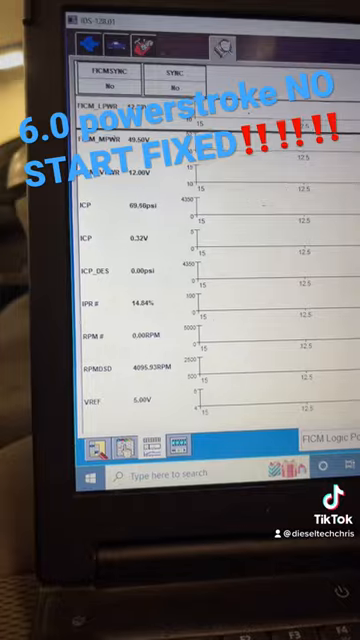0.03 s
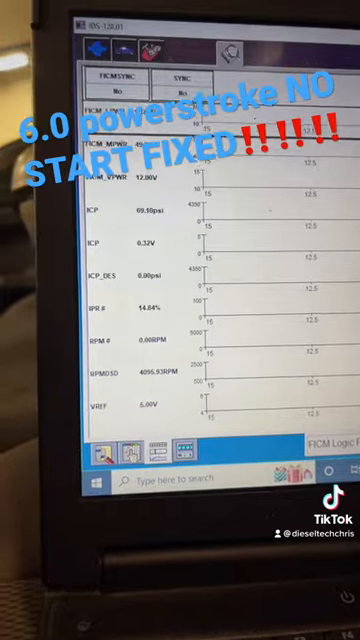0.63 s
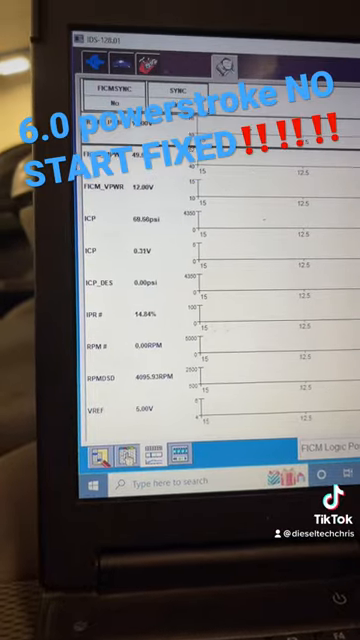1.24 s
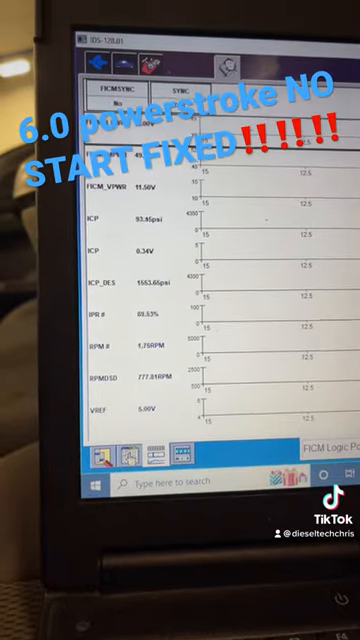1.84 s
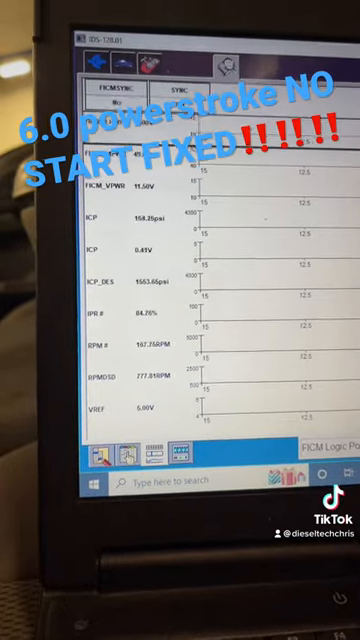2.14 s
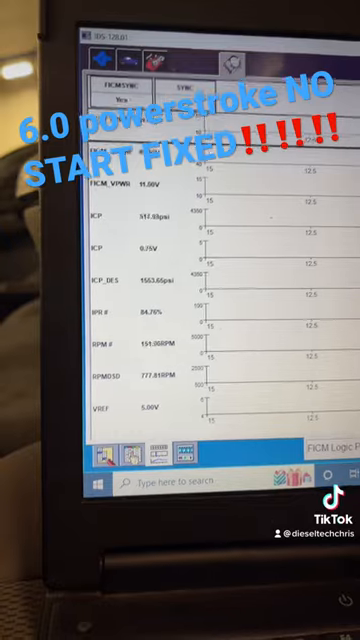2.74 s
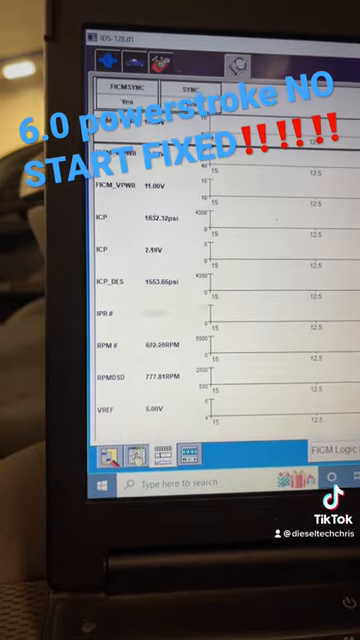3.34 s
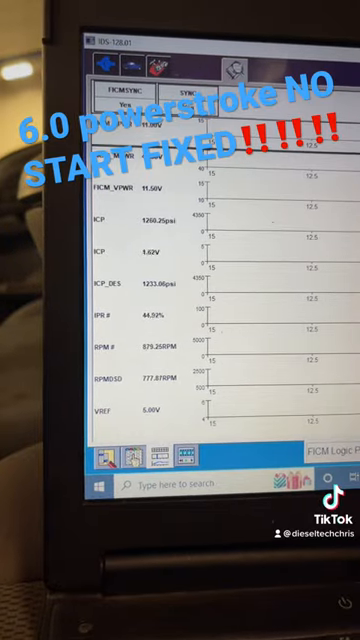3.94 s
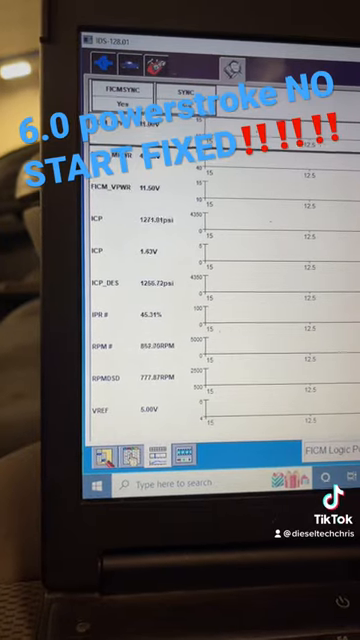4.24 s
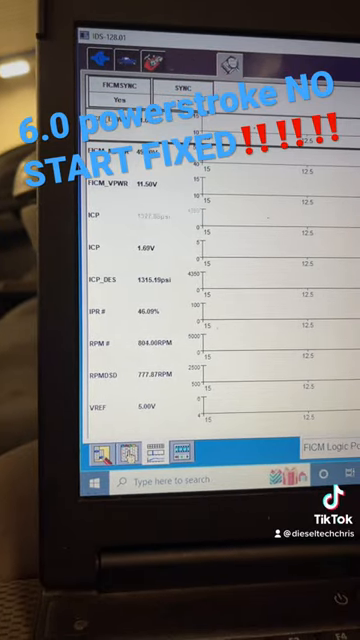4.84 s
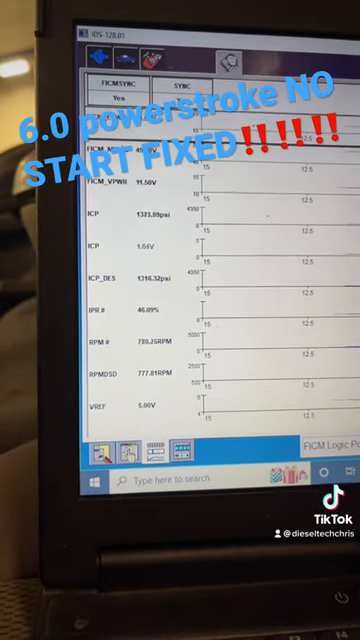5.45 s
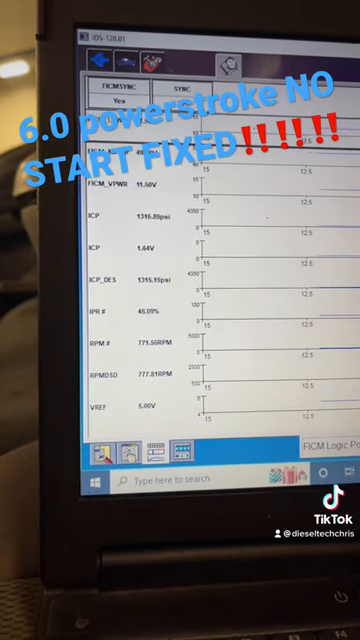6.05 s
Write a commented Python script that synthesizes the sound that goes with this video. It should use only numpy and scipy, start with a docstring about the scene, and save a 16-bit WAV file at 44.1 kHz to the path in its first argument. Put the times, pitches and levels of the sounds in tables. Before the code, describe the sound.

Inside a truck cab, a fuel pump hums faintly. The ignition key clicks and the starter grinds in a pulsing rhythm for just over a second. The diesel engine catches with low thuds and a loud burst of metallic knocking, and the key snaps back. The revs then sink into a steady idle, with a deep boom and ticking clatter heard from the driver's seat.

```python
"""A fuel pump hums faintly in the cab of a V8 diesel truck. The key clicks round and the starter
grinds over a dozen compressions, each of which modulates the pitch and level of its gears. The
engine catches: heavy firings rock the frame, combustion impacts ring the metal in a burst of hard
knock, and the key springs back. As the revs sink to idle, the second harmonic of the firing rate
slides into a cab resonance and booms."""
import sys
import numpy as np
from scipy import signal
from scipy.fft import rfft, irfft, next_fast_len
from scipy.io import wavfile

SR = 44100
rng = np.random.default_rng(int(sys.argv[2]) if len(sys.argv) > 2 else 0)


def log_audio(samples):
    """Write samples as a 16-bit WAV file to the path given in sys.argv[1]."""
    # one column per channel
    frames = np.atleast_2d(samples).T
    # limit to full scale, then quantise
    limited = np.clip(frames, -1, 1)
    pcm = np.round(limited * 32767).astype(np.int16)
    wavfile.write(sys.argv[1], SR, pcm)


N = 268877
T = np.arange(N) / SR
PADDED = next_fast_len(N + 4096)
HZ = np.fft.rfftfreq(PADDED, 1 / SR)


def amp(db):
    """Amplitude ratio of a level in decibels."""
    return 10 ** (np.asarray(db) / 20)


def unit(x):
    """Normalisation to rms 1."""
    return x / np.sqrt(np.mean(x ** 2) + 1e-20)


def noise():
    """Gaussian white noise."""
    return rng.standard_normal(N)


def wander(hz, t=T):
    """Random fluctuation up to about hz, rms near 1."""
    knots = rng.standard_normal(2048)
    return np.interp(t * hz * 2, np.arange(len(knots)), knots)


def ramp(start, end):
    """Linear rise from 0 to 1 between two times."""
    return np.clip((T - start) / max(end - start, 1e-3), 0, 1)


def swell(start, attack, hold, t60, db):
    """Envelope of linear attack, hold and exponential decay; times in seconds."""
    return ramp(start, start + attack) * amp(db - 60 * np.maximum(T - start - attack - hold, 0) / t60)


def gain_at(spectrum, hz):
    """Spectral envelope at hz, interpolated in level over log frequency."""
    f, db = np.transpose(spectrum)
    return amp(np.interp(np.log(hz + 1), np.log(f + 1), db))


def colour(x, spectrum, modes=(), ripple_db=0):
    """Source-filter shaping by an envelope, strong modes and the ripple of many weak ones; rms 1."""
    peaks = sum(amp(db) / (1 + (2 * (HZ - f) / width) ** 2) for f, width, db in modes)
    ripple = np.interp(HZ / 22, np.arange(1024), rng.uniform(-1, 1, 1024))
    gain = gain_at(spectrum, HZ) * (1 + peaks) * amp(ripple_db * ripple * np.minimum(HZ / 2000, 1))
    return unit(irfft(rfft(x, PADDED) * gain, PADDED)[:N])


def resonate(x, hz, width):
    """Forced resonance: a double pole of peak gain 1 takes time to build up and die."""
    r = np.exp(-np.pi * width / SR)
    carrier = np.exp(2j * np.pi * hz * T)
    return 2 * (carrier * signal.lfilter([(1 - r) ** 2], [1, -2 * r, r ** 2], x / carrier + 1e-18)).real


def impacts(cycles, scatter_db, t60):
    """Impact excitation: one uneven blow a cycle rings the dense modes of a metal part."""
    whole = np.maximum.accumulate(np.floor(cycles))
    blows = (np.diff(whole, prepend=whole[0]) > 0) * amp(scatter_db * noise())
    tail = rng.standard_normal(4096) * amp(-60 * T[:4096] / t60)
    return signal.oaconvolve(blows, tail / np.linalg.norm(tail))[:N]


# Partials of the pump's hum and spectrum of its hiss: f/Hz, level/dB
PUMP_PARTIALS = [(118.4, -65), (232, -76), (263.8, -79), (308, -82), (1351, -83), (2073, -79)]
HISS_SPECTRUM = [(22, -31), (50, -13), (88, 0), (125, -42), (180, -12), (260, -14), (420, -18), (700, -22),
                 (1300, -18.5), (1700, -18.5), (2080, -19), (2900, -26.5), (6900, -34.5), (15000, -45)]

def fuel_pump():
    """A line spectrum over broadband noise: the pump runs once the ignition is on."""
    wavering_time = T + np.cumsum(.0035 * wander(12)) / SR
    hum = sum(amp(db) * np.sqrt(2) * np.sin(2 * np.pi * hz * wavering_time) for hz, db in PUMP_PARTIALS)
    whine = amp(-70) * np.sin(2 * np.pi * 786 * wavering_time) * ramp(.4, .41)
    hiss = amp(-60.5) * colour(noise(), HISS_SPECTRUM, ripple_db=4.5)
    return (hum + whine + hiss) * ramp(.256, .262)


# Lock and solenoid clicks: t/s, level/dB, t60/s, power share of the thunk
KEY_CLICKS = [(0.859, -41, 0.085, .5), (0.892, -49, 0.05, 0.75), (0.92, -41, .07, 0.88),
              (0.931, -39, 0.095, .05), (2.452, -30, .03, 0), (2.702, -25.5, .05, 0.1),
              (2.777, -37, .04, .02)]
# Spectra of the bright snap and the dull thunk: f/Hz, level/dB
SNAP_SPECTRUM = [(500, -30), (3000, 7), (5500, 1), (7000, 6), (9000, -7), (11000, 0), (13000, -11),
                 (15500, -28)]
THUNK_SPECTRUM = [(80, -10), (300, -6), (600, 9), (900, -9), (2400, -5), (5000, -13), (12000, -35)]

def key_and_solenoid():
    """Damped transients: the ignition lock snaps round and back, and the solenoid thunks in."""
    snap = colour(noise(), SNAP_SPECTRUM)
    thunk = colour(noise(), THUNK_SPECTRUM)
    clicks = 0
    for start, db, t60, dull in KEY_CLICKS:
        decay = ramp(start, start + .00067) * amp(db - 60 * np.maximum(T - start, 0) / t60)
        clicks += decay * (np.sqrt(1 - dull) * snap + np.sqrt(dull) * thunk)
    return clicks


# First heavy firings that rock the engine on its mounts: t/s, level/dB
MOUNT_THUDS = [(2.305, -25), (2.359, -24), (2.405, -19), (2.437, -21), (2.486, -26)]

def mounts():
    """Structure-borne sound: firings kick two low frame modes, and the cab shakes as the revs flare."""
    thuds = 0
    for start, db in MOUNT_THUDS:
        age = np.maximum(T - start, 0)
        modes = np.sin(2 * np.pi * 47 * age) - np.sin(2 * np.pi * 86 * age)
        thuds += amp(db - 60 * age / .23) * modes * ramp(start, start + .0055)
    shake = colour(noise(), [(25, -39), (50, -13), (85, 6), (105, 3.5), (145, -9), (200, -33),
                             (900, -71)])
    return thuds + swell(2.24, attack=.28, hold=.2, t60=2.5, db=-24.8) * shake


ENGAGE_S, CATCH_S, TOP_S = .915, 2.19, 2.68
CRANK_HZ, TOP_HZ, IDLE_HZ = 10.1, 64.6, 50.1

def stroke_rates():
    """Fundamentals in compressions a second: cranking alone, and as the engine flares and settles."""
    shortfall, spin_up_s, settle_s = .4, .22, 1.2
    lag = shortfall * np.exp(-np.maximum(T - ENGAGE_S, 0) / spin_up_s)
    crank_hz = CRANK_HZ * (1 - lag) * (T > ENGAGE_S)
    governed_hz = IDLE_HZ + (TOP_HZ - IDLE_HZ) / (1 + (np.maximum(T - TOP_S, 0) / settle_s) ** 2.3)
    caught = np.sin(np.pi / 2 * ramp(CATCH_S, TOP_S)) ** 2
    return crank_hz, crank_hz + caught * (governed_hz - crank_hz)


# Spectra of the gears spinning up and at speed, and of the rocking block: f/Hz, level/dB
SLOW_GEAR_SPECTRUM = [(150, -14), (260, -4), (380, -13), (640, -10), (860, -1), (1130, -3), (1340, -13),
                      (1660, -8.5), (2250, -8), (2920, -15.5), (3500, -21), (5000, -29), (6600, -29.5),
                      (9000, -45), (15500, -56)]
FAST_GEAR_SPECTRUM = [(150, -19.5), (380, -6), (520, -17), (720, -6), (1350, -4), (1800, -13.5),
                      (2200, -7.5), (2850, -11), (3350, -17), (3800, -17.5), (4800, -27.5), (6600, -26),
                      (9000, -43), (15500, -53)]
SHUDDER_SPECTRUM = [(13, -42), (22, 0), (38, 1.5), (54, 4), (104, -3), (125, -12), (146, -10), (200, -27),
                    (260, -48), (440, -120)]
# Resonances of the starter housing: f/Hz, bandwidth/Hz, level/dB
HOUSING_MODES = [(890, 39.6, -6), (1183, 48, -0.5), (1383, 75, -2.5), (2070, 41.4, -4), (3800, 110, 0),
                 (6650, 540, -12)]

def starter(crank_hz, strokes):
    """Gear-mesh harmonics under load modulation: each compression slows the motor, then lets it race."""
    teeth_per_stroke = 33.9
    elapsed = T - ENGAGE_S
    racing = -np.cos(2 * np.pi * strokes) * ramp(1.05, 1.42)  # high between compressions
    unloaded = ramp(2.25, 2.42)  # the firing engine takes over
    sway = 1 + .028 * np.cos(2 * np.pi * (strokes - .35)) + .011 * wander(50)
    teeth = np.cumsum(teeth_per_stroke * crank_hz * (1 + .16 * unloaded) * sway) / SR
    whine = 0
    for k in range(1, 13):
        whine += np.cos(2 * np.pi * (k * teeth + rng.random())) * (1 + 1.3 * wander(60)) * min(k / 3, 1)
    grind = noise() * np.exp(.2 * np.cos(2 * np.pi * .57 * teeth))  # the armature scrapes once a turn
    drive = unit(grind) + amp(-12.5) * unit(whine)
    at_speed = ramp(1.205, 1.373)
    slow = np.sqrt(1 - at_speed) * colour(drive, SLOW_GEAR_SPECTRUM, ripple_db=6)
    fast = np.sqrt(at_speed) * colour(drive, FAST_GEAR_SPECTRUM, HOUSING_MODES, ripple_db=3.5)
    gears = (amp(-2) * slow + fast) * ramp(.9, .955) * amp(-32.6 + 2.6 * elapsed + 1.5 * racing)
    squawk = colour(drive, [(600, -40), (860, 0), (1120, -1), (1400, -25), (4000, -50)])
    squawk *= swell(1.1, attack=.025, hold=.01, t60=.28, db=-34.5)  # the pinion takes the load
    brushes = colour(noise(), [(3000, -30), (6500, 11), (9000, -5), (15000, -3)])
    brushes *= amp(-63.2 + 2.2 * elapsed + 3.2 * racing)
    lurch = swell(.935, attack=.035, hold=.015, t60=1.1, db=-37.5)  # the starter's bite twists the block
    rocking = (lurch + amp(-39.8) * ramp(1.24, 1.31)) * amp(1.4 * np.cos(2 * np.pi * (strokes - .6)))
    shudder = rocking * colour(noise(), SHUDDER_SPECTRUM)
    return (gears + squawk + brushes + shudder) * ramp(.904, .925) * (1 - unloaded)


CYLINDERS = 8
# Transmission of the exhaust into the cab: f/Hz, level/dB
CAB_RESPONSE = [(20, -24), (36, -15), (48, -15), (62, 0), (76, -1), (92, 5), (109, 13), (122, -8.5),
                (140, 7.5), (156, -11.5), (172, -1), (186, -4.5), (202, -1), (214, -6.5), (232, 0.5),
                (245, 1.5), (262, -5), (290, -12.5), (450, -14.5), (800, -36.5)]

def exhaust_rumble(firing_hz, strokes):
    """Unequal cylinders repeat once an engine cycle, giving a comb at eighths of the firing rate."""
    t, hz, cycles = T[::16], firing_hz[::16], strokes[::16]
    comb = 0
    for order in np.arange(3, 64) / CYLINDERS:
        phase = 2 * np.pi * (order * cycles + rng.random()) + .41 * wander(4, t)
        comb += gain_at(CAB_RESPONSE, order * hz) * np.cos(phase)
    comb = np.interp(T, t, comb * np.sqrt(hz))  # offsets the crowding of orders at low speed
    puffs = colour(noise() * np.exp(-(strokes % 1) / .5), CAB_RESPONSE + [(3000, -90)])
    return amp(-27.2) * (unit(comb) + amp(-9) * puffs) * ramp(2.25, 2.42)


# Cab resonances: driving harmonic of the firing rate, f/Hz, bandwidth/Hz, level/dB
CAB_MODES = [(1, 51.3, 4, -31), (2, 108, 7.5, -12.4)]

def exhaust_tones(strokes):
    """Swept resonance: harmonics of the firing rate boom as they slide into the cab's modes."""
    phase = 2 * np.pi * strokes
    sharpness = ramp(2.5, 2.65) * (1 - ramp(2.69, 2.8))  # full fuel sharpens the pulses
    pulses = np.sin(phase) + amp(-4.5) * np.sin(2 * phase) + amp(-7) * sharpness * np.sin(3 * phase)
    uneven = amp(1.5 * wander(12))  # cold cylinders burn unequally
    flare = swell(2.46, attack=.17, hold=.04, t60=2.9, db=-19.3) * uneven * pulses
    lope = 1 + .33 * np.cos(phase / CYLINDERS)  # one throb an engine cycle
    booms = sum(amp(db) * resonate(lope * np.sin(k * phase), f, width) for k, f, width, db in CAB_MODES)
    steady = (amp(-35.5) * np.sin(phase) + booms) * ramp(2.31, 2.43)
    return np.sqrt(2) * (flare + steady)


# Spectra of hard knock, idle clatter and injector fizz: f/Hz, level/dB
KNOCK_SPECTRUM = [(150, 8), (250, -11.5), (550, -3), (740, 0), (1030, -3), (1700, -4), (2600, -4),
                  (3120, -1), (3450, -12), (4000, -14.5), (5000, -22.5), (6600, -17), (9000, -27.5),
                  (12000, -44.5), (15500, -52)]
IDLE_SPECTRUM = [(150, -15), (290, 1), (450, -1), (600, -2), (850, 0.5), (1500, -1), (1750, -2.5),
                 (2700, -9), (3350, -8), (4600, -15.5), (5200, -18.5), (7000, -20), (9000, -35.5),
                 (12000, -39.5), (15500, -48)]
FIZZ_SPECTRUM = [(3000, -26), (6500, 6.5), (9000, -1.5), (11000, -2), (15500, -8)]
# Resonances of the engine metal under hard knock and at idle: f/Hz, bandwidth/Hz, level/dB
HARD_KNOCK_MODES = [(1038, 57, 1), (1520, 50, 1), (2850, 72, -2), (2930, 43, -4), (3165, 37, -3)]
IDLE_MODES = [(464, 35, -9.5), (815, 44, -6), (1030.3, 34, -6), (1456, 64, -5.5), (1609.6, 43, -11),
              (2040, 54, -10), (2280, 120, -10), (3470, 66, -7), (4175, 95, -5), (5150, 270, -2.5),
              (7230, 350, -5.5)]

def engine_clatter(strokes):
    """Impacts excite structural modes: cylinders knock, injectors and valves tick."""
    taps = 0
    for pair in range(4):
        revolutions = (strokes - pair) / 4
        knocks = impacts(revolutions + .004 * wander(30), scatter_db=1.2, t60=.11)
        ticks = impacts(strokes + pair / 4 + .13 * wander(30), scatter_db=2.1, t60=.019)
        taps += knocks + amp(-2) * ticks
    taps = colour(taps, [(300, .5), (550, -2), (1500, -1.3), (2500, -3.5), (6000, -7.5), (15000, -6.5)])
    wash = colour(noise(), [(300, -3), (550, -3), (1500, .8), (2500, 1), (6000, -1), (15000, -1.5)])
    drive = taps + amp(4.5) * wash  # the engine bay smears the blows, most in the treble
    weak = swell(2.205, attack=.035, hold=.1, t60=.5, db=-29.3)  # the first cylinders barely light
    hard = swell(2.3, attack=.17, hold=.045, t60=1.2, db=-17)  # all burn on full starting fuel
    knock = (weak + hard) * colour(drive, KNOCK_SPECTRUM, HARD_KNOCK_MODES, ripple_db=1.5)
    idle = amp(-27.3) * ramp(2.2, 3.3) * colour(drive, IDLE_SPECTRUM, IDLE_MODES, ripple_db=4.5)
    knock_edge = swell(2.31, attack=.12, hold=.13, t60=.45, db=-47.5) + amp(-32) * weak
    oil_pressure = ramp(2.92, 3.35)  # the injectors fizz as it builds
    fizz = (knock_edge + amp(-52) * oil_pressure) * colour(drive, FIZZ_SPECTRUM, ripple_db=3.5)
    return knock + idle + fizz


def scene():
    """Superposition of all sources at the driver's seat."""
    crank_hz, firing_hz = stroke_rates()
    strokes = np.cumsum(firing_hz) / SR - .11  # compressions fall on whole numbers
    starting = fuel_pump() + key_and_solenoid() + starter(crank_hz, strokes) + mounts()
    running = exhaust_rumble(firing_hz, strokes) + exhaust_tones(strokes) + engine_clatter(strokes)
    return (starting + running)[None]


def record(dry):
    """Band limiting by a steep low-pass at 15.8 kHz."""
    low_pass = signal.firwin(1023, 15800, window=("kaiser", 9), fs=SR)
    return signal.oaconvolve(dry, low_pass[None], "same")


dry = scene()
out = record(dry)
log_audio(out)
```